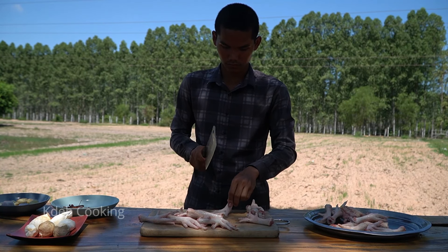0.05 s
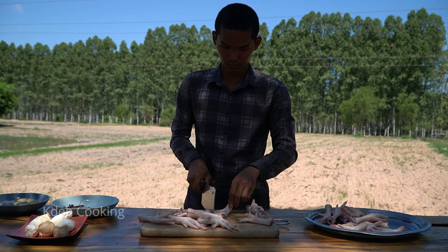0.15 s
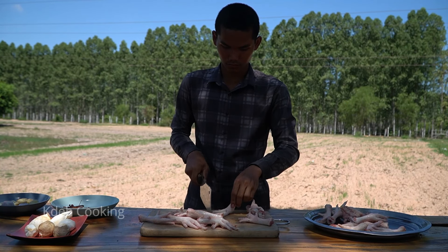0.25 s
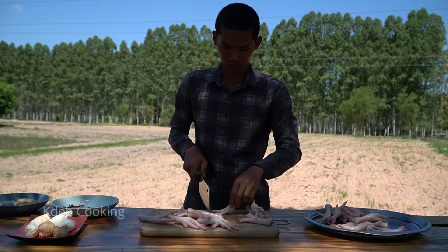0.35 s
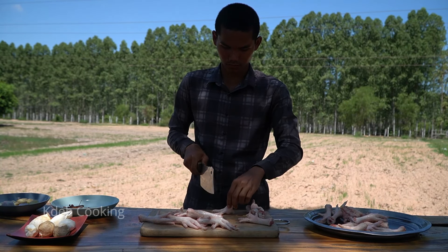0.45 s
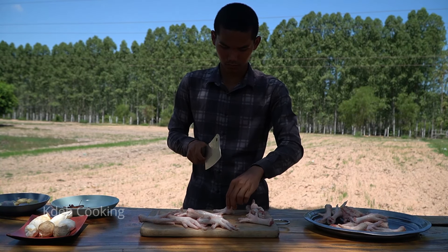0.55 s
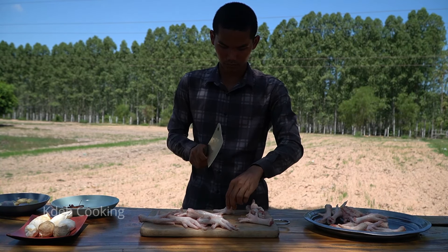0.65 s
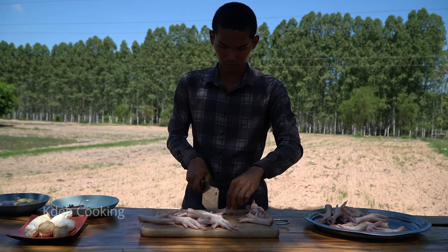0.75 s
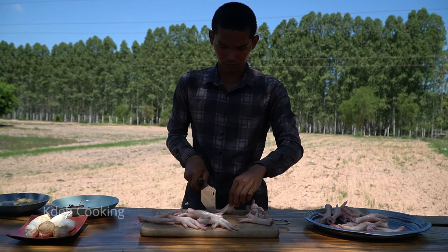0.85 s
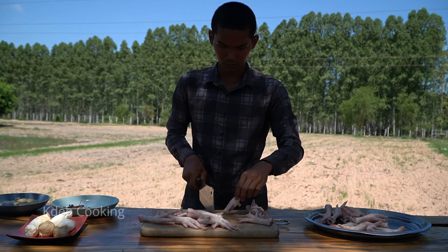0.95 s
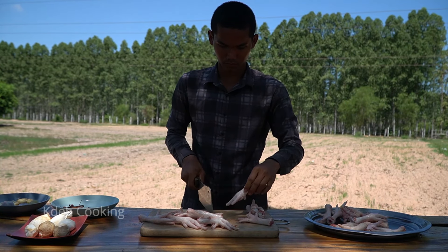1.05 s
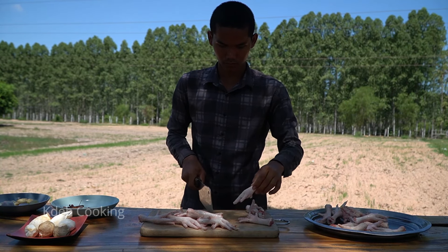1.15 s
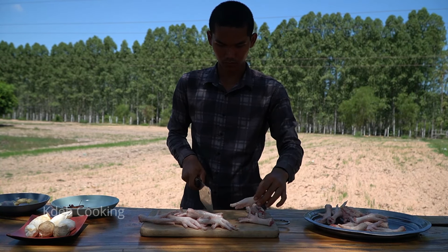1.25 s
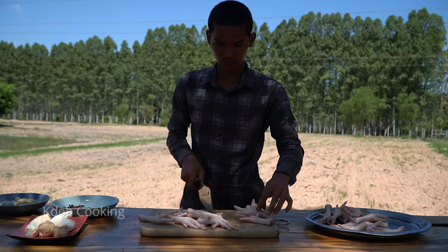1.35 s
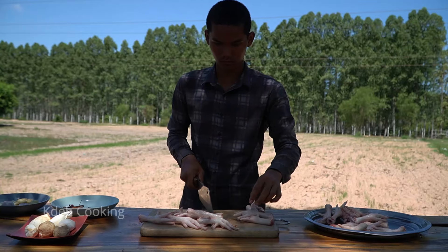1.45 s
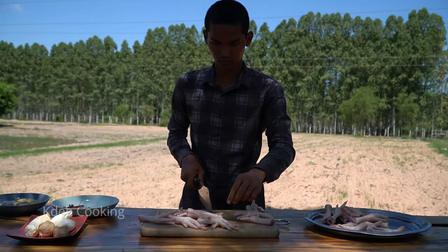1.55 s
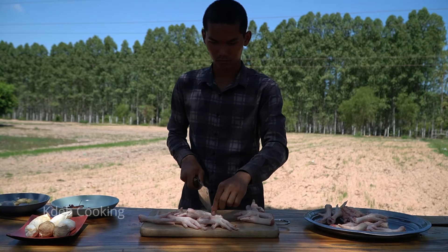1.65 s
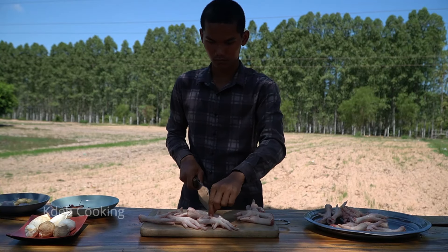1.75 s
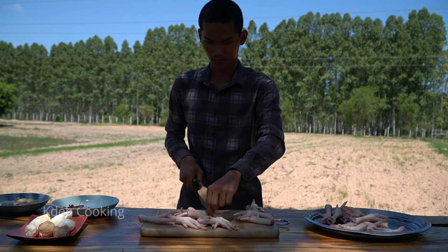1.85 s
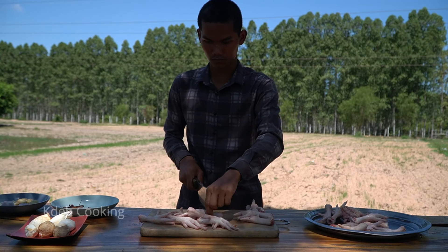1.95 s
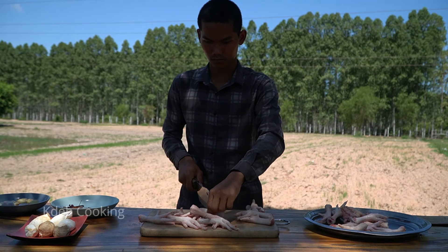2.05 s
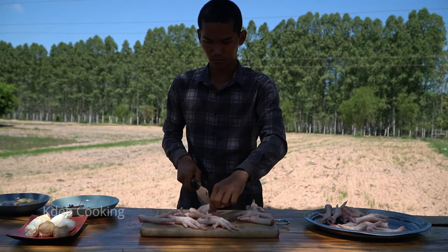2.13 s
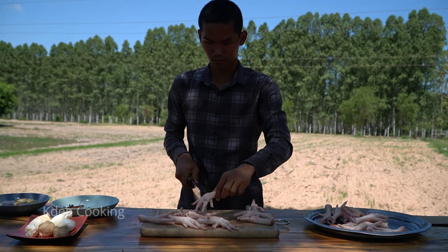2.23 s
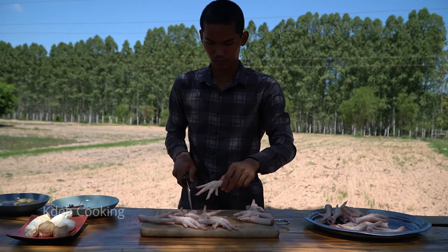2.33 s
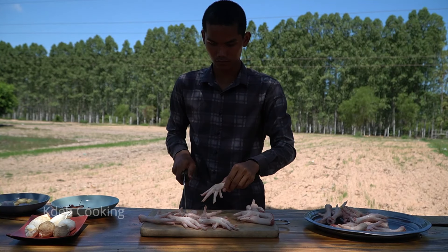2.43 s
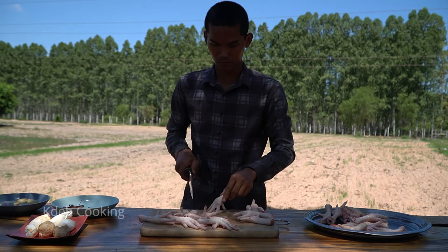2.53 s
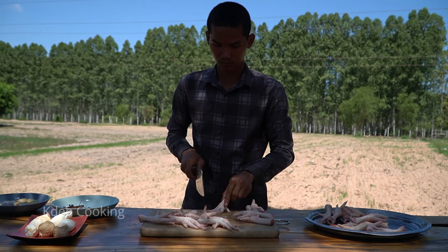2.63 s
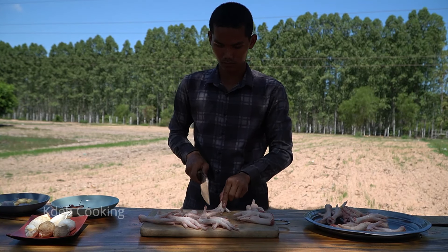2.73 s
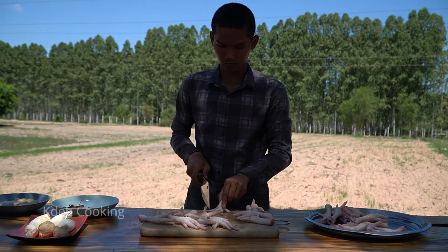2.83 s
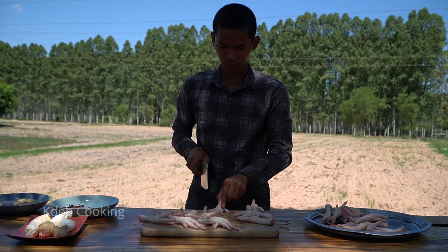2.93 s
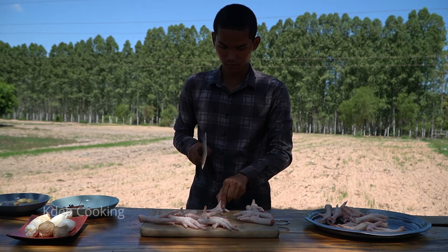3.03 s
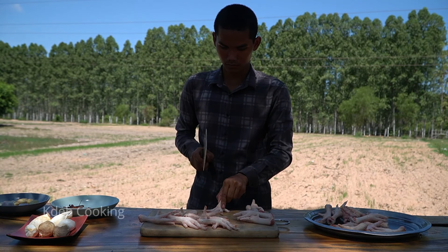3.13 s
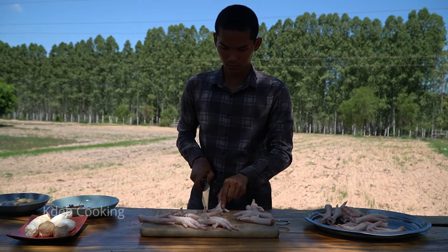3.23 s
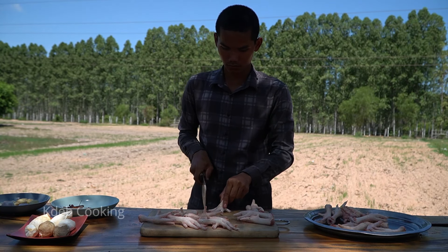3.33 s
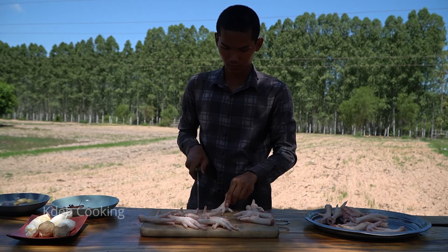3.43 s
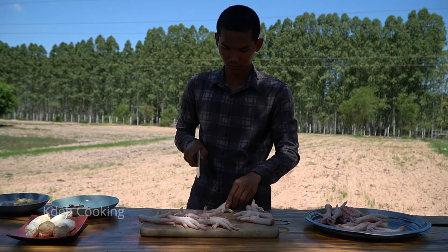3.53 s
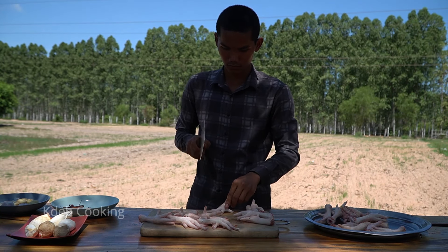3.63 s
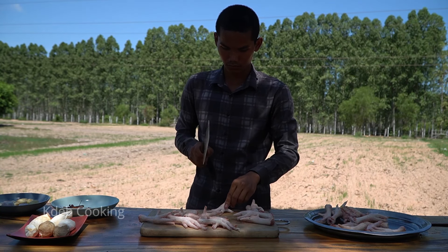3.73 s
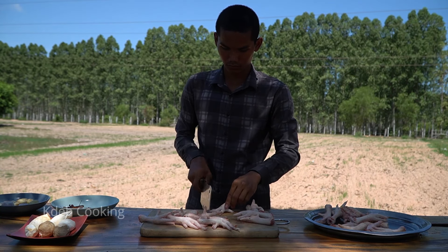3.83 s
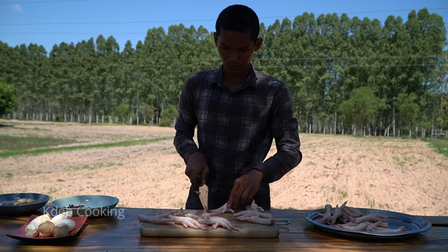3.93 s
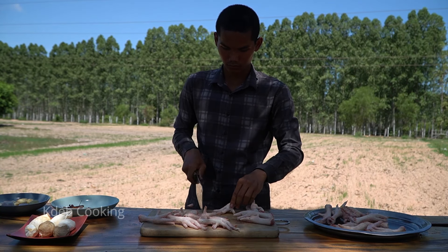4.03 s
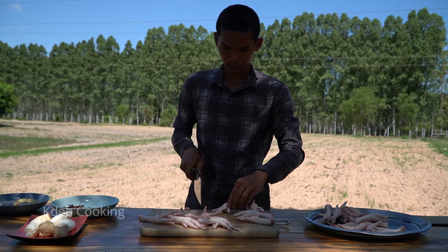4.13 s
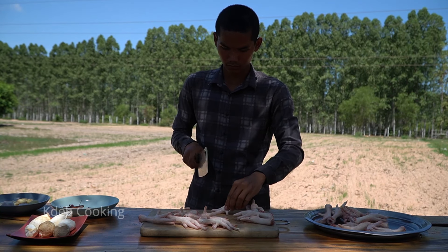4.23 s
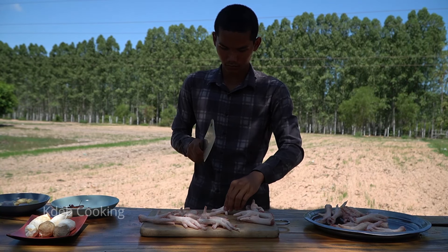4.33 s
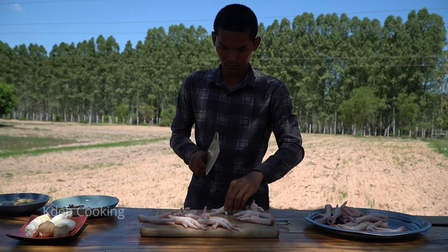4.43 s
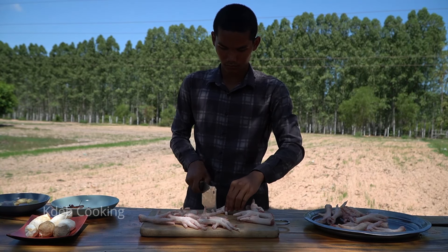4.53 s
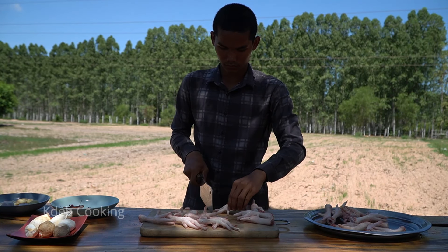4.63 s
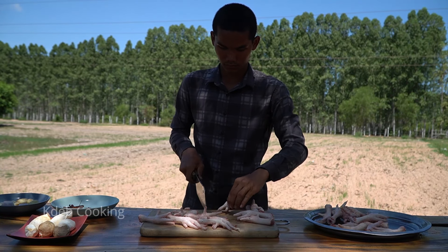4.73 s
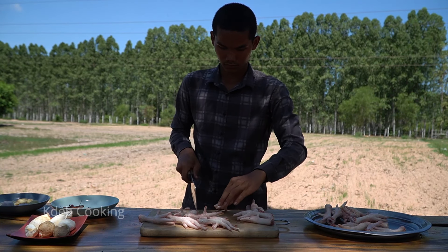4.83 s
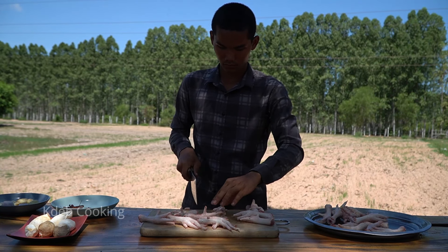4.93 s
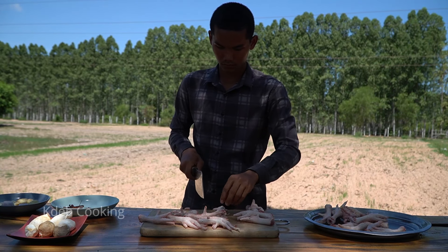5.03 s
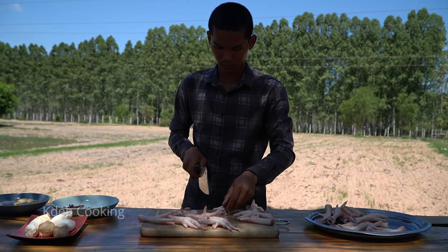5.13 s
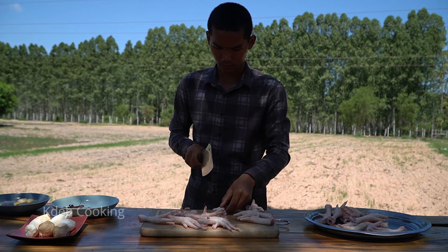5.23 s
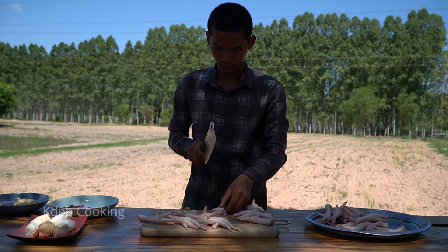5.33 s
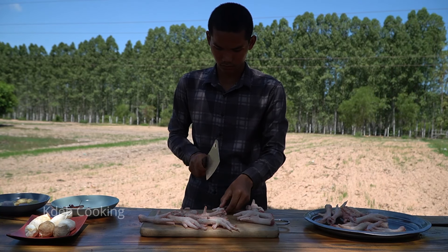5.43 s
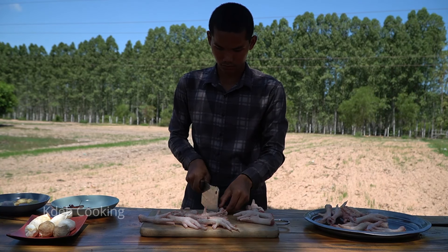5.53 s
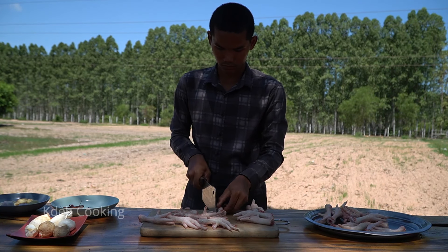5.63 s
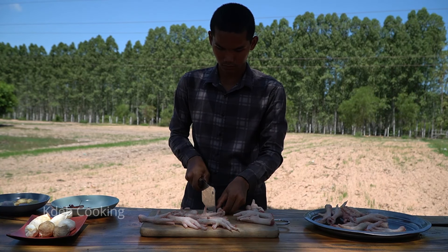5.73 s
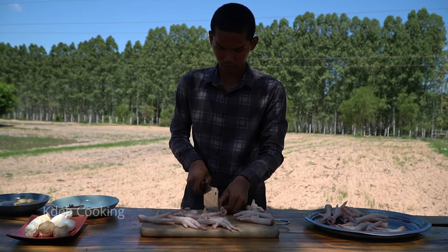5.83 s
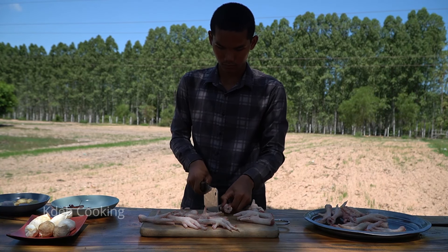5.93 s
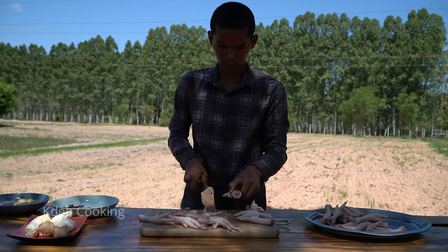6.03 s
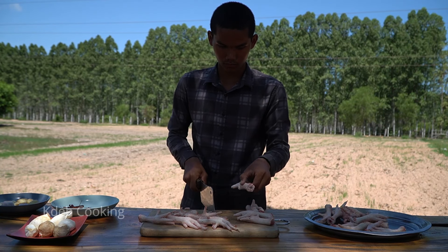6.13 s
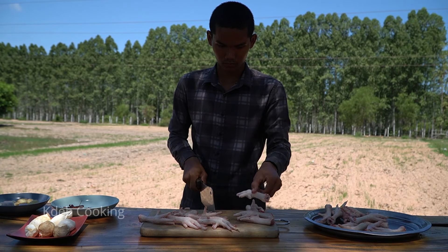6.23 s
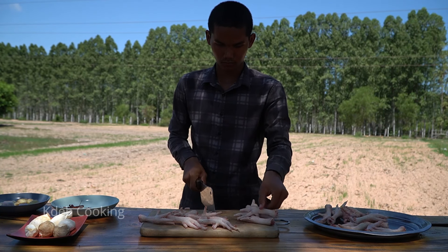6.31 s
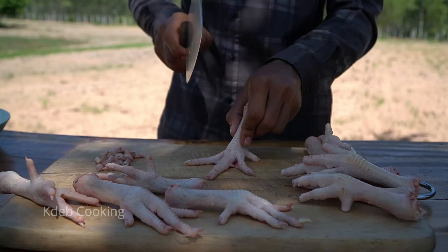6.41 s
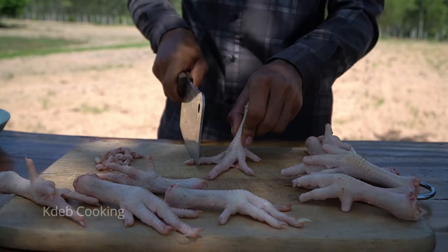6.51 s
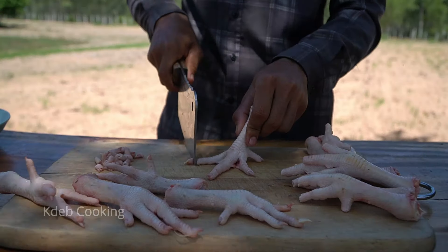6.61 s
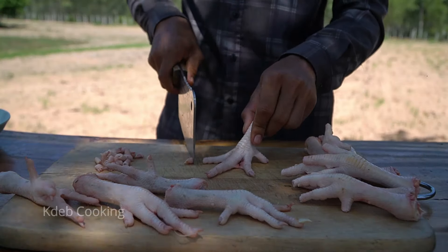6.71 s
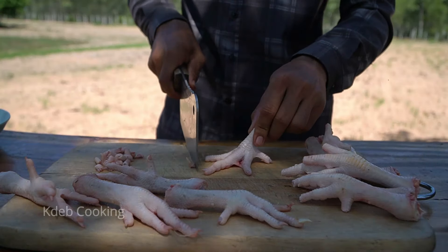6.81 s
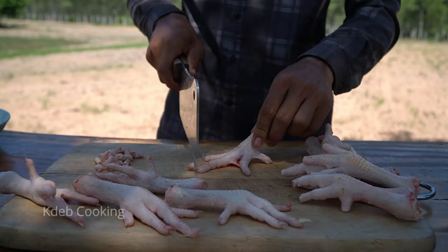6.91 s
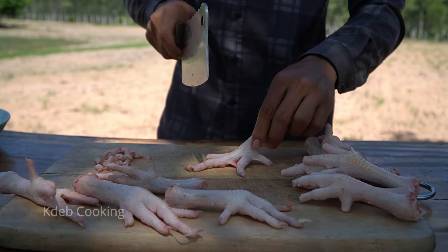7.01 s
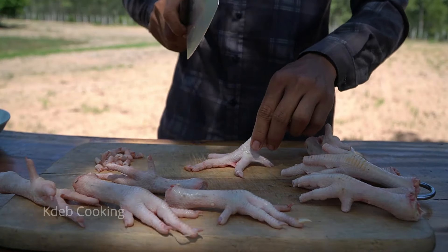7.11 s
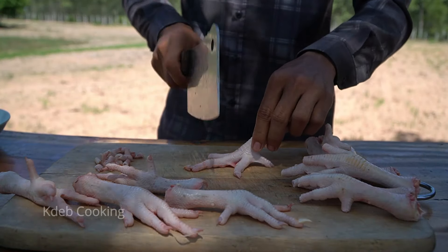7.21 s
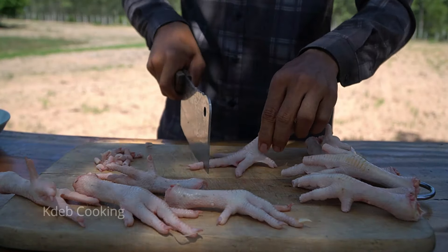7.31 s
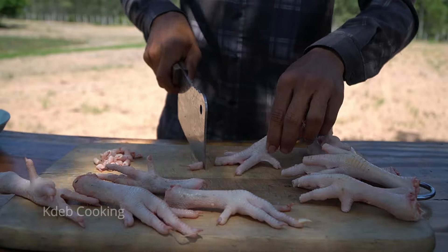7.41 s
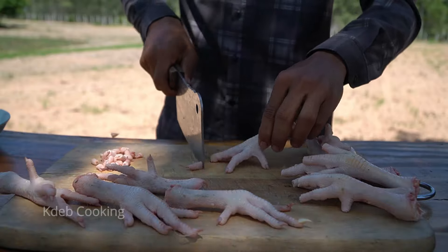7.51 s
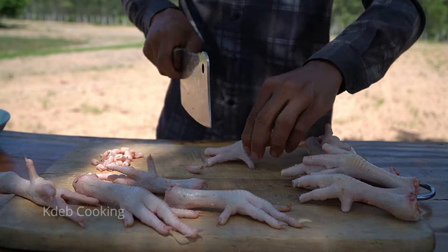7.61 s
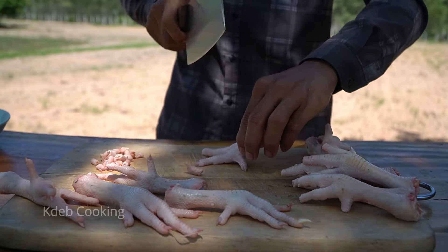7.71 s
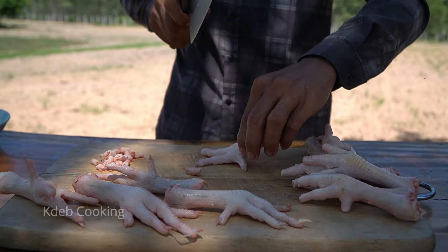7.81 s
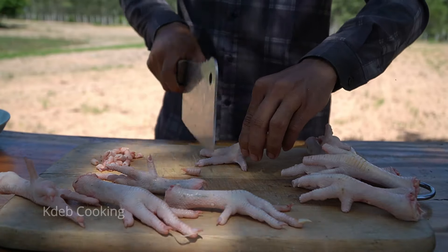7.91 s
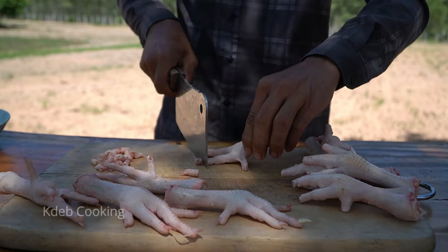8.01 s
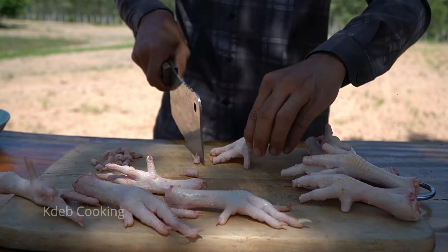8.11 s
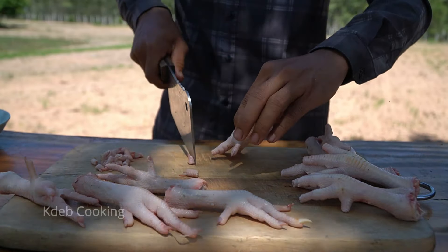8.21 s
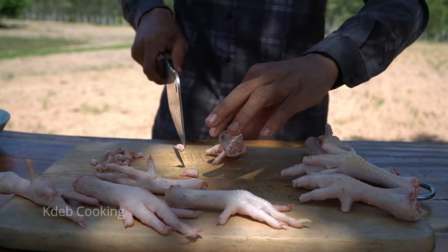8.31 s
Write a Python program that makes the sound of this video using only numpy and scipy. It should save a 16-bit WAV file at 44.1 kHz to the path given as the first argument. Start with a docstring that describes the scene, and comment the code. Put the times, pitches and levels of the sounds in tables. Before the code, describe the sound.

Sharp woody cleaver cuts crack and bounce on a board, the last three closer and louder, over soft leaf hiss and distant birdsong.

```python
"""Chopping poultry feet outdoors

A cleaver cuts on a wooden board on an outdoor table: each cut cracks and bounces (short damped knocks),
rings the wood (a bank of modes) and leaves the table rattling (decaying bands of noise).
Between cuts the blade scrapes (slips ringing wood and steel), a small bird twitters on the left (gliding
sines) and leaves hiss (filtered noise). The last three cuts come from a second spot, with louder, brighter hiss."""
import sys
import numpy as np
from scipy import signal
from scipy.io import wavfile

SR = 44100
rng = np.random.default_rng(int(sys.argv[2]) if len(sys.argv) > 2 else 0)


def nominal_scale(level):
    """Amplitude ratio for a level in decibels (scalar or array-like)."""
    x = np.asarray(level, float) / 20
    return 10 ** x


def master_out(mix):
    """Clip the mix to full scale and print it as 16-bit PCM to the path in sys.argv[1]."""
    frames = np.transpose(np.atleast_2d(mix))
    ceiling = np.clip(frames, -1, 1)
    pcm = np.round(ceiling * 32767).astype(np.int16)
    wavfile.write(sys.argv[1], SR, pcm)


N = 368676
TIME = np.arange(N) / SR
SPOT_CHANGE_S = 6.425   # the second listening spot begins
THUMP_BELOW_HZ = 350   # the table thump of a cut acts below this
OPPOSITE = np.array([[1], [-1]])   # signs of a difference between left and right

# What each cut leaves shaking on the table. Each row: start in seconds, rattle level in relative dB,
# extra table thump in dB, base decay time t60 in seconds, blow on the board in relative dB.
CUTS = [(.205, -7.5, -1.5, 0.59, -13), (.816, -3, -6, 0.53, -10.5), (3.282, -7, 3.5, 0.56, -11),
        (3.891, -7.5, 2, 0.52, -14), (4.563, -6.5, -1.5, 0.61, -11), (5.553, -6.5, 5.5, 0.37, -15.5),
        (6.52, -2, 1, 0.47, -9.5), (7.295, -2, 1, 0.34, -9.5), (7.981, -0.5, -0.5, 0.53, -7.5)]


def at_hz(points, hz):
    """A spectrum given at a few points is read by straight lines on a log-frequency axis."""
    points_hz, values = np.transpose(points)
    return np.interp(np.log(hz), np.log(points_hz), values)


def filtered(x, order, hz, kind):
    """A Butterworth filter passes its band with the flattest possible response."""
    return signal.sosfilt(signal.butter(order, hz, kind, fs=SR, output="sos"), x)


def clicks(seconds, sizes):
    """An impulse train excites all frequencies equally at each of its instants."""
    out = np.full(N, 1e-18)
    out[np.round(np.asarray(seconds) * SR).astype(int)] = sizes
    return out


def drift(rate_hz):
    """White noise through two equal low-pass poles wanders slowly; it is scaled to spread 1."""
    hop = 40   # samples between computed points
    pole = np.exp(-2 * np.pi * hop * rate_hz / SR)
    white = rng.standard_normal(N // hop + 2002)
    slow = signal.lfilter([1], [1, -2 * pole, pole * pole], white)[2000:]   # skip the settling
    return np.interp(np.arange(N) / hop, np.arange(len(slow)), slow / slow.std())


def ring(x, hz, width_hz):
    """A two-pole resonator answers a unit click with a sine under an exponential decay from 1."""
    pole, turn = np.exp(-np.pi * width_hz / SR), 2 * np.pi * hz / SR
    return signal.lfilter([0, np.sin(turn)], [1, -2 * pole * np.cos(turn), pole * pole], x)


def resonances(x, peaks, wander_db=0):
    """Parallel resonators add with alternating signs; each may wax and wane as the contact moves."""
    out = 0
    for k, (hz, width_hz, db) in enumerate(peaks):
        gain = (-1) ** k * nominal_scale(db + wander_db * drift(4))
        out = out + gain * np.sqrt(width_hz) * ring(x, hz, width_hz)
    return out


def noise_bands(likeness):
    """Mixing shared and opposed noise sets the left-right correlation of each half-octave: yields (Hz, band)."""
    # Level difference of the channels. Each row: frequency in Hz, left minus right in dB.
    lean = [(60, -1), (240, -0.5), (950, 1), (3770, 2.5), (15000, 0.5)]
    edges_hz = 30 * 2 ** np.arange(0, 9.3, .5)
    white = rng.standard_normal((2, 2, N))
    for k, (low, high) in enumerate(zip(edges_hz, edges_hz[1:])):
        mid, side = filtered(white[k % 2], 2, [low, high], "band")
        hz = np.sqrt(low * high)
        alike = np.clip(at_hz(likeness, hz), 0, 1)
        pair = np.sqrt(1 + alike) * mid + np.sqrt(1 - alike) * side * OPPOSITE
        yield hz, pair * nominal_scale(at_hz(lean, hz) / 2 * OPPOSITE)


def swells(rows, top_db, foot_db):
    """An envelope straight in dB climbs from each row's start to its top and falls to its end."""
    out = 0
    for row, db in zip(rows, top_db):
        out = out + nominal_scale(np.interp(TIME, row[:3], [db + foot_db, db, db + foot_db], -200, -200))
    return out


def leaves():
    """Many tiny independent contacts of far foliage sum to noise, coloured by spot and stirred by the breeze."""
    # Hiss colour at each spot. Each row: frequency in Hz, relative density in dB per Hz.
    first_colour = [(18, -72), (30, -37), (103, -22), (138, -20), (170, -21), (721, -12.5), (1010, -9),
                    (2060, -3), (2540, -3.5), (5040, -11.5), (16000, -34)]
    second_colour = [(18, -73), (30, -37), (215, -28), (889, -9.5), (962, -10), (1670, -4), (2290, -4.5),
                     (3980, -4), (8300, -13), (13000, -19), (16000, -24)]
    # Each row: frequency in Hz, left-right likeness of the hiss (negative values act as 0).
    likeness = [(60, 0.81), (240, 0.57), (950, 0.4), (3770, 0.34), (15000, -1.1)]
    # Strength of the hiss. Each row: time in seconds, relative level in dB.
    breeze = [(0, -67.5), (1.6, -69.5), (2.3, -68), (4.4, -69.5), (4.95, -66), (5.5, -69), (6.2, -67.5),
              (7.2, -68), (8.36, -67.5)]
    second_spot_db = 8.5
    out, gust = 0, drift(0.61)
    for hz, band in noise_bands(likeness):
        second_db = at_hz(second_colour, hz) + second_spot_db
        colour_db = np.where(TIME < SPOT_CHANGE_S, at_hz(first_colour, hz), second_db)
        flicker_db = 0.1 * gust + 0.89 * drift(9.7)
        out = out + nominal_scale(colour_db + flicker_db) * band
    return out * nominal_scale(np.interp(TIME, *np.transpose(breeze)) + 12)


def bird():
    """A whistle is a sine of linearly gliding pitch; scattered echoes smear the song, heard at the first spot only."""
    # Notes of the song. Each row: middle in seconds from its high note, relative level in dB,
    # middle frequency in Hz, glide in Hz per millisecond.
    song = [(-.382, -5, 4480, -26.5), (-.309, -3.5, 4250, -25), (-.2, -2, 3750, -35),
            (-.153, 1.5, 3830, -34.5), (-.128, -5.5, 3620, -46), (-.085, -8, 3900, -29),
            (-.044, -2, 3840, 10), (0, -1, 4330, -10), (.027, 3, 3760, 33.5), (.055, 0.5, 3550, -49),
            (.087, -5, 3560, -39), (.125, -13, 3280, -28), (.19, -6, 3260, -33.5)]
    # Repeats of the song. Each row: time of the high note in seconds, relative level in dB.
    songs = [(.062, -59.5), (1.271, -59.5), (2.508, -59), (3.876, -59.5), (5.182, -62), (6.471, -67)]
    chirp_s, spread_db, spread_hz = .0055, 2, 34   # Gaussian half-width of a note; chance spreads
    pan_db = 3.0   # raises the left and lowers the right by this
    out = np.zeros(N)
    for high_note_s, song_db in songs:
        for (s, db, hz, glide), luck in zip(song, rng.standard_normal((len(song), 2))):
            middle = high_note_s + s
            i = slice(max(0, round((middle - .03) * SR)), max(0, round((middle + .03) * SR)))
            t = TIME[i] - middle
            phase = 2 * np.pi * ((hz + spread_hz * luck[0]) * t + glide * 1000 * t * t / 2)
            level = nominal_scale(song_db + db + spread_db * luck[1])
            out[i] += level * np.exp(-(t / chirp_s) ** 2 / 2) * np.sin(phase)
    age = np.arange(12000) / SR
    echoes = rng.standard_normal((2, 12000)) * nominal_scale(-30 - 60 * age / .7)   # t60 of 0.7 s
    smear = signal.fftconvolve(out[None], echoes)[:, :N]
    return (out * nominal_scale(pan_db * OPPOSITE) + smear) * (TIME < SPOT_CHANGE_S)


def drone():
    """A pure tone is a sine of constant frequency; this faint low one comes and goes."""
    # Each row: start, loudest point and end in seconds, rms level at the loudest in dB.
    rows = [(2.328, 2.49, 2.54, -90), (2.568, 2.628, 3, -87), (3.41, 3.457, 3.62, -77.5),
            (3.673, 3.71, 3.88, -86)]
    tone = np.sqrt(2) * np.sin(2 * np.pi * 198 * TIME)   # rms 1
    return swells(rows, np.transpose(rows)[-1], -10.5) * tone


def thuds():
    """Two heavily damped resonators in series make a soft set-down swell before its dull ring dies."""
    # Each row: start in seconds, nominal peak in dB, frequency in Hz.
    set_downs = [(2.235, -74, 205), (2.846, -64, 243), (6.269, -68, 580)]
    out = 0
    for s, db, hz in set_downs:
        swelling = ring(clicks([s], nominal_scale(db - 40.5)), hz, 48)
        out = out + ring(swelling, hz, 42)
    return out


def rustle():
    """Friction of damp skin sliding on wood is soft noise, shaped by two broad resonances."""
    # A hand shifting pieces. Each row: start, loudest point and end in seconds, level in dB.
    rows = [(0, -0.004, .15, -67), (2.878, 2.927, 3.07, -64), (6.11, 6.16, 6.24, -68),
            (6.246, 6.274, 6.36, -69.5)]
    # Resonances of the rub. Each row: frequency in Hz, width in Hz, relative level in dB.
    colour = [(1350, 360, 5.5), (2080, 330, 6.5)]
    rub = resonances(rng.standard_normal((2, N)), colour)
    rub = (rub[0] + .5 * rub[1] * OPPOSITE) / rub.std()
    return swells(rows, np.transpose(rows)[-1], -15) * rub


def scrapes():
    """Stick-slip: an edge dragged over the grain gives random slips that ring the wood and the steel."""
    # Drags of the blade. Each row: start, hardest point and end in seconds, wood level in dB, steel level in dB.
    drags = [(2.25, 2.345, 2.415, -68, -65), (3.98, 4.04, 4.14, -66, -73), (4.735, 4.788, 4.86, -62, -63),
             (5.83, 5.875, 5.95, -78, -73), (6.04, 6.082, 6.12, -82, -77), (6.79, 6.85, 6.92, -64, -64),
             (7.392, 7.397, 7.43, -68, -53), (8.08, 8.086, 8.115, -64, -52)]
    # Wood, then blade resonances. Each row: frequency in Hz, width in Hz, relative level in dB.
    wood_peaks = [(520, 37, -4.5), (850, 51, 2), (1275, 136, 3.5), (1880, 33, -6.5)]
    steel_peaks = [(2750, 40, 1), (3884, 540, -2), (5180, 70, 0), (5520, 26, -1.5), (6160, 55, -3),
                   (6690, 66, -4.5), (8490, 140, 1), (9730, 150, -7.5), (10200, 130, -10),
                   (11640, 200, -18), (11950, 70, -16), (13600, 150, -16), (15900, 120, -21)]
    edge_from_hz, thin_edge_db = 9000, -5   # the thin edge rings above this; its level re the blade body
    foot_db, wander_db = -9.5, 4   # both ends of a drag re its hardest; wander of the contact
    chance = 250 * nominal_scale(5 * drift(30)) / SR   # about 250 slips a second, in clusters
    size = nominal_scale(1.6 * np.minimum(rng.exponential(1, N), 4))
    slips = (rng.random(N) < chance) * size * rng.choice([-1, 1], N)
    grind = slips + .05 * rng.standard_normal(N)
    wood = resonances(grind, wood_peaks)
    blade = resonances(grind, [p for p in steel_peaks if p[0] < edge_from_hz], wander_db)
    edge = resonances(grind, [p for p in steel_peaks if p[0] > edge_from_hz], wander_db)
    wood_db, steel_db = np.transpose(drags)[3:]
    wood = swells(drags, wood_db, foot_db) * wood / wood.std()
    steel = blade / blade.std() + nominal_scale(thin_edge_db) * edge / edge.std()
    steel = swells(drags, steel_db, foot_db) * steel

    # one run of 16 separate slips at a quickening pace
    count = np.arange(16)
    gaps = .0083 + .0098 * np.exp(-count / 3.2)   # seconds
    s, luck = 2.2477 + np.cumsum(gaps) - gaps, rng.standard_normal((len(count), 2))
    slip_db = -51 + 1.5 * luck[:, 0]
    soft = filtered(clicks(s, nominal_scale(slip_db)), 2, 2500, "low")
    wood = wood + nominal_scale(-24) * resonances(soft, wood_peaks)
    hard = clicks(s, nominal_scale(slip_db - 7 + 2.0 * luck[:, 1]))
    steel += nominal_scale(-28.5) * resonances(hard, steel_peaks)
    return wood + steel * nominal_scale(1.0 * OPPOSITE)   # steel 2 dB louder on the left


def rattle():
    """Countless small impacts of plates, pieces and planks sum to lumpy noise, each band with its own decay."""
    # Each row: frequency in Hz, relative density in dB per Hz.
    colour = [(59, -70), (100, -33.5), (322, -9), (389, -24.5), (535, -1.5), (705, -12.5), (1010, -2.5),
              (1360, -3.5), (3620, -14.5), (16000, -71.5)]
    # Each row: frequency in Hz, share of a cut's t60.
    t60_share = [(100, 1.2), (300, 0.85), (1000, 0.91), (2500, 0.58), (6000, 0.47), (15000, 0.75)]
    # Each row: frequency in Hz, left-right likeness.
    likeness = [(100, 1), (550, 0.85), (1650, 0.59), (5000, 0.15), (15000, 0.15)]
    # Faint, longer wash from the tree line. Each row: frequency in Hz, level in dB re the rattle.
    trees = [(100, -17), (500, -25.5), (1100, -12.5), (2000, -21.5), (5000, -16), (15000, 2.5)]
    # Treble tilt at the first and second spot, in dB per octave.
    tilt_db = [3, 2.5]
    trees_t60_s, rattle_db = 1.234, -16
    out, lumps = np.zeros((2, N)), drift(45)
    for hz, band in noise_bands(likeness):
        for s, level_db, thump_db, t60, _ in CUTS:
            i = slice(round(s * SR), min(N, round(s * SR) + SR))   # one second at most
            age = TIME[i] - s + 1e-9
            quick_drop_db = 15.9 * np.exp(-age / 0.0049)
            fall_db = quick_drop_db - 60 * age / (t60 * at_hz(t60_share, hz))
            swell = 1 - np.exp(-age * hz / 2.9)   # lows take longer to build
            tilt = tilt_db[int(s > SPOT_CHANGE_S)] * np.log2(hz / 1000)
            db = level_db + rattle_db + at_hz(colour, hz) + tilt + thump_db * (hz < THUMP_BELOW_HZ)
            echo = nominal_scale(at_hz(trees, hz) - 60 * age / trees_t60_s)
            out[:, i] += nominal_scale(db) * (nominal_scale(fall_db + 2.4 * lumps[i]) + echo) * swell * band[:, i]
    return out


def board():
    """Modal synthesis: a blow feeds each mode of board and table; the loose board rocks, so each ring wavers."""
    # Modes. Each row: frequency in Hz, then t60 in seconds (before the cap below) and relative level in dB
    # at the first spot, and the same two at the second.
    modes = [(146.7, 0.3, -56, 0.19, -56), (164.3, 0.13, -57, 0.19, -57.5), (247, 0.16, -51.5, 0.31, -68),
             (292.5, 0.39, -56.5, 0.27, -55.5), (334.3, 0.34, -60.5, 0.43, -55),
             (449.3, 0.37, -50.5, 0.4, -44), (518, 0.27, -39, 0.36, -43.5), (565, 0.24, -40, 0.32, -40.5),
             (788, 0.37, -45.5, 0.8, -57.5), (870, 0.35, -38, 0.34, -47), (953, 0.66, -44.5, 0.84, -47),
             (1000, 0.45, -49.5, 0.83, -47.5), (1026, 0.63, -47.5, 0.75, -46.5),
             (1071, 0.19, -42, 0.66, -42), (1115, 0.28, -49.5, 0.42, -54), (1206, 0.29, -47, 0.37, -67),
             (1270, 0.83, -47, 0.31, -60), (1352, 0.97, -50, 0.83, -57), (1400, 0.63, -58, 0.17, -46),
             (1488, 0.185, -58.5, 0.19, -70), (1633, 0.69, -53, 0.69, -53), (1766, 0.35, -47, 0.43, -46),
             (1857, 0.15, -56, 0.37, -78), (2250, 0.2, -38.5, 0.32, -69)]
    # Cap on the t60 at the first and second spot, in seconds.
    longest_ring_s = [.85, .95]
    drive_db, strike_spread_db, bloom_cycles = 13.5, 2.0, 8.4
    s, thump_db, blow_db = np.transpose(CUTS)[[0, 2, 4]]
    spread, wood = rng.standard_normal((len(s), len(modes))), np.zeros(N)
    change = round(SPOT_CHANGE_S * SR)
    spots = [slice(0, change), slice(change, N)]
    for k, (hz, *heard) in enumerate(modes):
        width_hz = hz / bloom_cycles / np.pi   # each mode takes some cycles to pick up the blow
        blow = blow_db + thump_db * (hz < THUMP_BELOW_HZ) + drive_db + strike_spread_db * spread[:, k]
        push = ring(clicks(s + 0.00199, nominal_scale(blow)), hz, width_hz) * 2 * np.pi * width_hz / SR
        waver = (-1) ** k * (1 + drift(6 + hz / 70))
        for spot, t60, db, longest in zip(spots, heard[::2], heard[1::2], longest_ring_s):
            ring_width_hz = np.log(1000) / (np.pi * min(t60, longest))
            wood[spot] += nominal_scale(db) * waver[spot] * ring(push[spot], hz, ring_width_hz)
    return wood


def knocks():
    """Impact: each contact of blade and board is a damped knock of a few cycles with a hard edge and grit."""
    # Contacts, first crack then bounces. Each row: time in seconds, nominal peak in dB, knock frequency in Hz.
    contacts = [(0.2068, -11, 1570), (0.2104, -14.5, 2270), (0.2171, -20.5, 983), (.2291, -26.5, 1180),
                (.818, -12, 1570), (0.8285, -28, 1740), (0.8339, -35, 1240), (0.8584, -32, 1040),
                (3.2844, -16, 1435), (3.2873, -19, 1752), (3.2998, -21, 1220), (3.3035, -20, 2920),
                (3.8933, -17.5, 1350), (3.905, -20, 1270), (3.913, -13, 1370), (4.565, -14.5, 1400),
                (4.5685, -17, 2400), (4.577, -18, 1420), (4.5855, -19, 2500), (5.556, -17, 1386),
                (5.5602, -19.5, 940), (5.5702, -30, 1100), (5.574, -18.5, 2370), (6.522, -12.5, 1115),
                (6.5268, -23, 1410), (6.5446, -15.5, 2245), (6.5585, -26, 1010), (7.2963, -9.5, 1020),
                (7.3046, -35, 915), (7.3132, -18.5, 890), (7.321, -27, 1000), (7.985, -8, 1447),
                (7.9874, -14.5, 1000), (7.9907, -37, 1400), (8.0045, -16, 2206), (8.0193, -24.5, 900)]
    # Resonances of the hard edge. Each row: frequency in Hz, width in Hz, level in dB.
    edge_peaks = [(2400, 3200, 5.5), (3970, 3700, 6)]
    knock_cycles = 2.78   # sets how many cycles a knock lasts
    s, peak_db, knock_hz = np.transpose(contacts)
    crack, spot = np.diff(s, prepend=0) > .1, (s > SPOT_CHANGE_S).astype(int)
    # relative to the peak; grit and bone have one level for each spot
    edge_db = np.where(crack, -6.5, -10.5)   # the crack is the brighter contact
    grit_db = np.where(crack, np.take([-26, -13], spot), np.take([-32.5, -45], spot))
    body = np.zeros(N)
    for at, db, hz in zip(s, peak_db, knock_hz):
        i = slice(round((at - .001) * SR), round((at + .012) * SR))
        cycles = np.maximum((TIME[i] - at) * hz + 0.67, 0)
        envelope = cycles * np.exp(-cycles * 3.15 / knock_cycles)
        body[i] += nominal_scale(db + 8) * envelope * np.sin(2 * np.pi * cycles)

    edge = filtered(clicks(s, nominal_scale(peak_db + edge_db + 11.5)), 2, [1200, 5000], "band")
    for k, (hz, width_hz, db) in enumerate(edge_peaks):
        body += (-1) ** k * nominal_scale(db) * ring(edge, hz, width_hz)

    puff = signal.lfilter([1], [1, -.98], clicks(s - .0008, nominal_scale(peak_db + grit_db)))
    # the edge splinters bone, ever louder, just before it meets the wood
    lead_s, rise_db = 0.0035, 6.5
    for at, db in zip(s[crack] - lead_s, np.take([-41, -26.5], spot[crack])):
        climb_db = rise_db * np.clip((TIME - at) / lead_s - 1, -1, 0)
        puff += nominal_scale(db + climb_db) * (TIME > at) * (TIME < at + lead_s)
    grit = filtered(rng.standard_normal((2, N)), 3, [1800, 11000], "band")
    return body + puff * (grit[0] + .5 * grit[1] * OPPOSITE)


def scene():
    """Superposition: all sources add; board and table, small radiators, send out little bass."""
    table = filtered(knocks() + board() + rattle() + scrapes(), 4, 130, "high")
    return table + rustle() + thuds() + bird() + drone() + leaves()


def band_limit(x):
    """A steep low-pass at the top of the band."""
    return signal.sosfilt(signal.butter(12, 17040, fs=SR, output="sos"), x)


def record(dry):
    """A microphone's bass roll-off is a second-order high-pass at 35 Hz."""
    mix = filtered(dry, 2, 35, "high")
    return band_limit(mix)


dry = scene()
out = record(dry)
master_out(out)
```